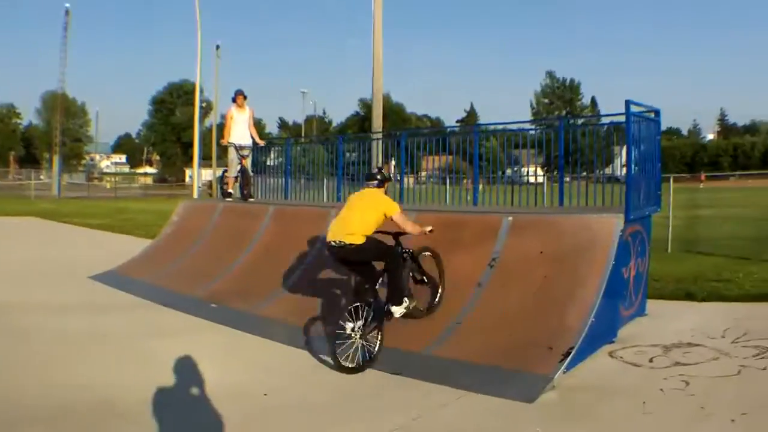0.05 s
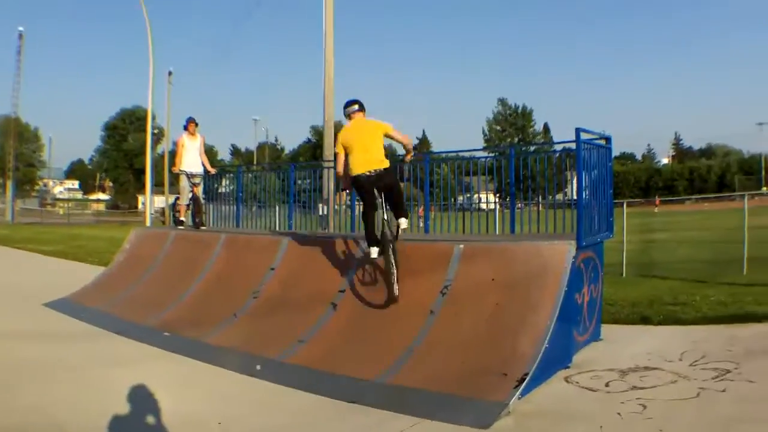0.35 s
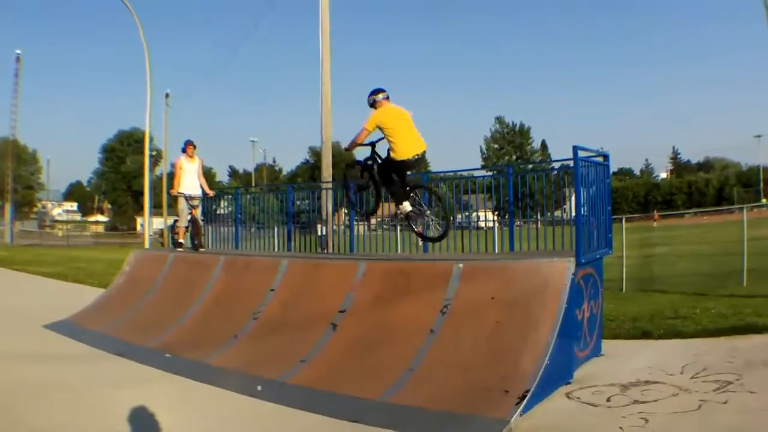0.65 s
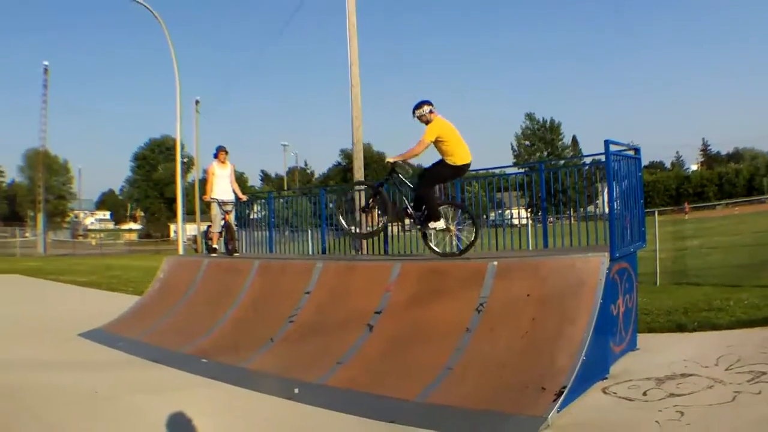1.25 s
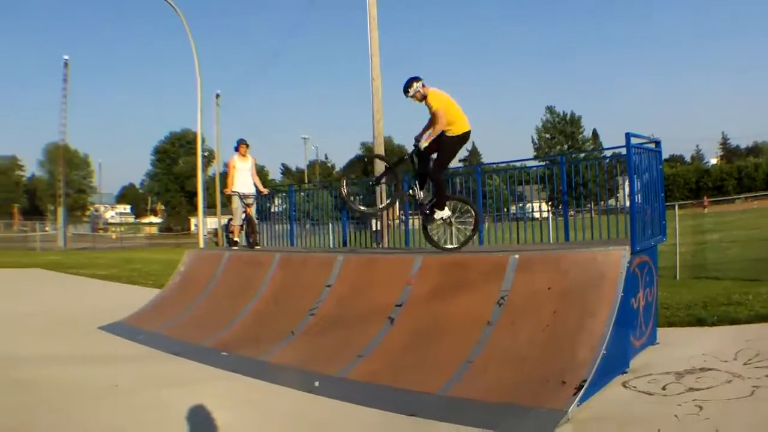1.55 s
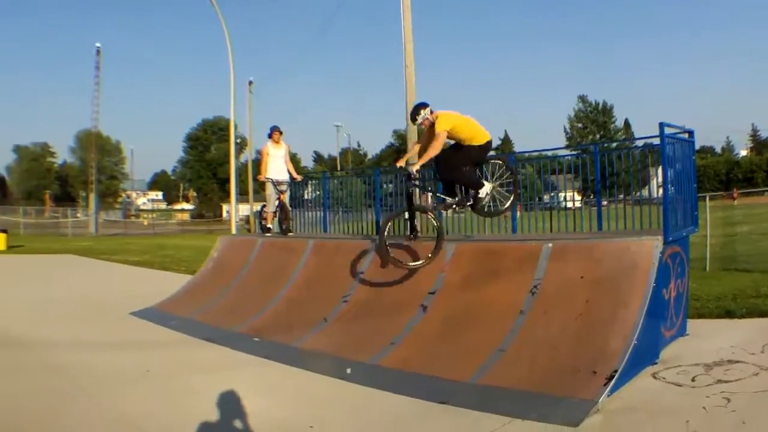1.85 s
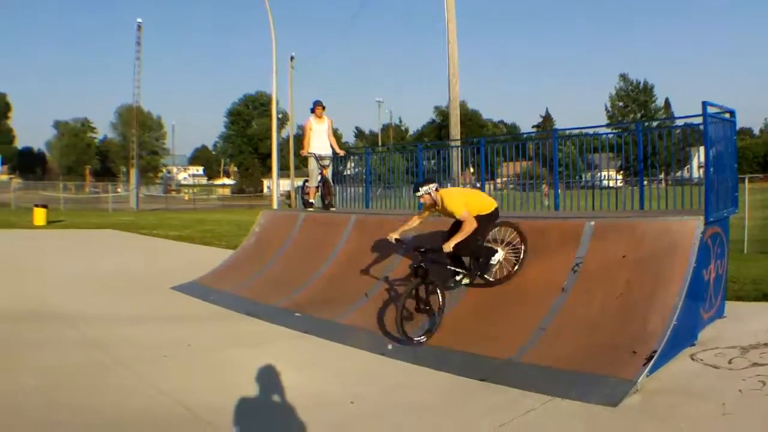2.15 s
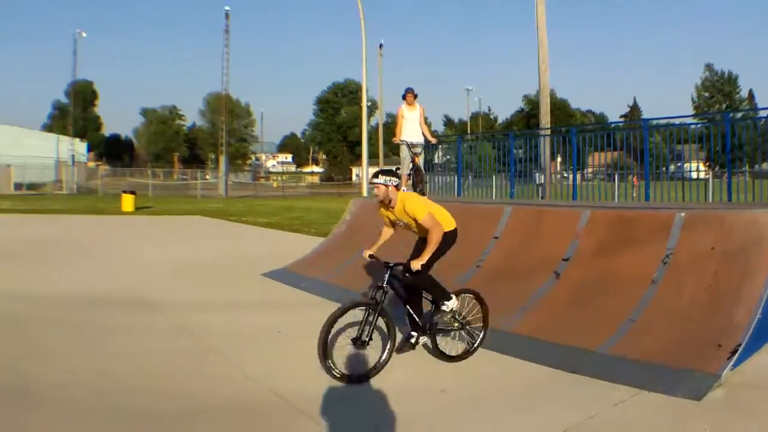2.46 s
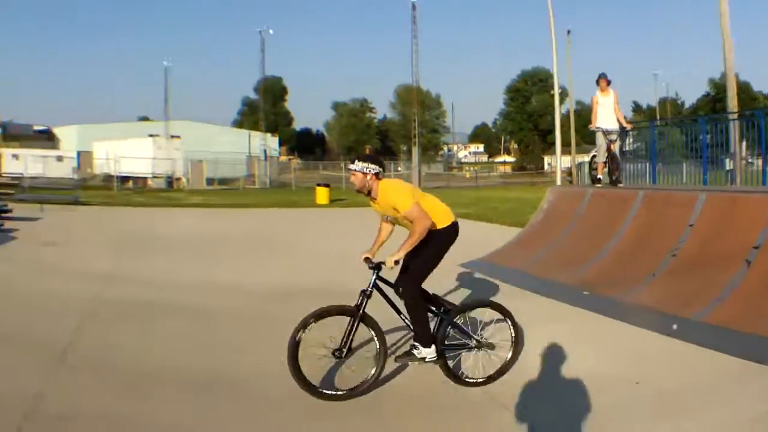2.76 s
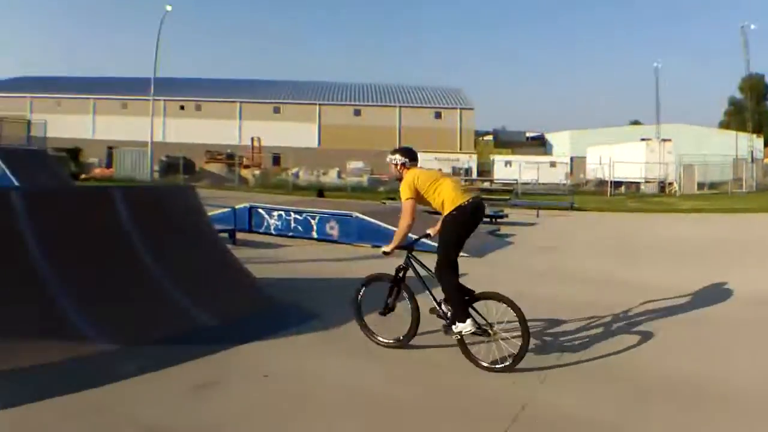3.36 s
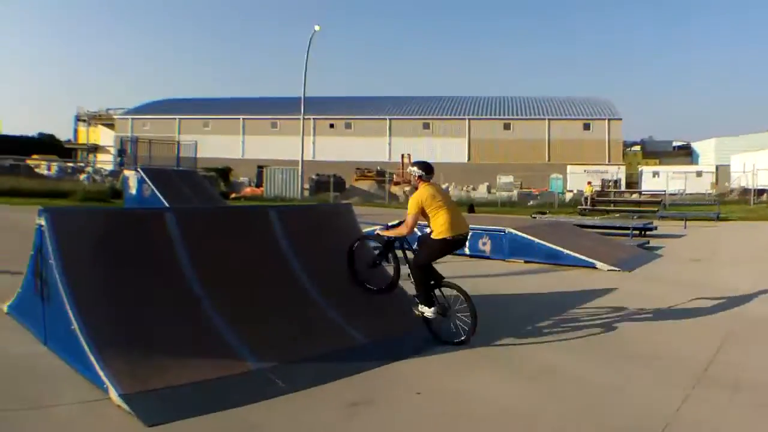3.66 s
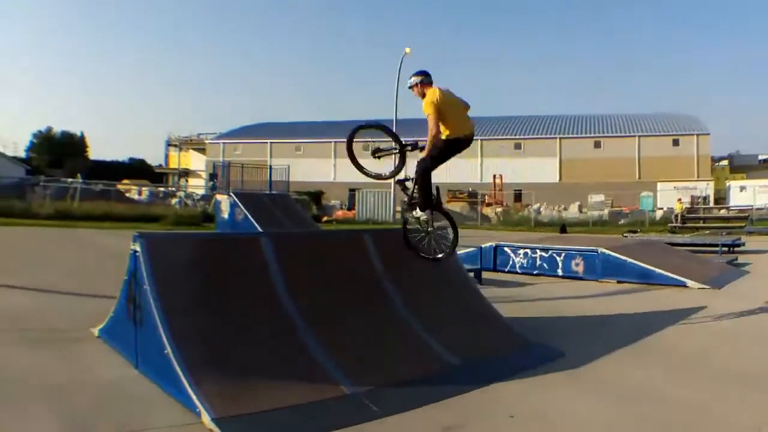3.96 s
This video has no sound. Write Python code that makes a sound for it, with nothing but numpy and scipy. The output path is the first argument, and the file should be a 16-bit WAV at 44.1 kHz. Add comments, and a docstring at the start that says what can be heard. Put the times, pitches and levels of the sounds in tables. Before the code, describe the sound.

A bicycle thumps and rumbles up a hollow ramp, its freewheel ticking. A dull pop comes at 0.6 seconds, then lighter knocks around 0.9 and a faint tyre scuff near 1.6. From 2 to 2.5 seconds it booms and rattles back down. A sharp, close clack follows at 2.75, tyres roll over concrete, and from 3.6 the wheels clank and rumble onto a second ramp. Distant traffic lies underneath.

```python
"""Bicycle on skatepark ramps.

A bike rides up a hollow ramp, stalls on the deck, drops back in, rolls over concrete and hits a
second ramp at its steel foot plate. Wheel blows and rolling set the panels booming while the bike
rattles and its freewheel ticks. One sharp clack close by echoes off the bars of a railing.
Distant traffic lies underneath."""
import sys
import numpy as np
from scipy import signal
from scipy.fft import rfft, irfft
from scipy.io import wavfile

SR = 44100
rng = np.random.default_rng(int(sys.argv[2]) if len(sys.argv) > 2 else 0)


def put_to_file(sound):
    """Save the sound as 16-bit audio at rate SR, in the file named by the first command-line argument."""
    columns = np.atleast_2d(sound).T  # one column per channel
    safe = np.clip(columns, -1, 1)
    whole_steps = np.round(safe * 32767)
    wavfile.write(sys.argv[1], SR, whole_steps.astype(np.int16))


N = 176400


def undb(db):
    """Decibels to gain."""
    return 10 ** (np.asarray(db) / 20)


def curve(rows):
    """Gain over time from (time_s, level_db) points."""
    time_s, level_db = np.array(rows).T
    return undb(np.interp(np.arange(N) / SR, time_s, level_db))


def fade(t, t60_s):
    """Exponential decay from t = 0."""
    return (t >= 0) * np.exp(-np.log(1000) * np.maximum(t, 0) / t60_s)


def noise():
    """White noise."""
    return rng.standard_normal(N)


def wander(rate_hz):
    """Smooth random drift of unit spread."""
    drift = np.interp(np.arange(N) * rate_hz / SR, np.arange(N), noise())
    return drift / drift.std()


def convolve(x, response):
    """Play x through an impulse response."""
    return signal.fftconvolve(x, response)[:N]


def colour(x, spectrum, size=4096):
    """Minimum-phase filter from (freq_hz, gain_db) points, scaled to keep the power of white noise."""
    freq_hz, gain_db = np.array(spectrum).T
    bins_hz = np.arange(size // 2 + 1) * SR / size
    gain = undb(np.interp(np.log(bins_hz + 1), np.log(freq_hz), gain_db))
    cepstrum = irfft(np.log(gain))
    cepstrum[1:size // 2] *= 2
    cepstrum[size // 2 + 1:] = 0
    response = irfft(np.exp(rfft(cepstrum)))
    return convolve(x, response / np.linalg.norm(response))


def ring_modes(age_s, modes):
    """Decaying sines from (pitch_hz, gain_db, t60_s) rows."""
    return sum(undb(db) * fade(age_s, t60_s) * np.sin(2 * np.pi * hz * age_s) for hz, db, t60_s in modes)


def resonate(drive, spectrum, t60_s, tail_t60_s, tail_db, spots=8):
    """A body with dense modes, struck at shifting spots: a quick decay, then a longer tail."""
    spots_per_s, spots_at_once = 5, 4
    age_s = np.arange(SR) / SR
    decay = fade(age_s, t60_s) + undb(tail_db) * fade(age_s, tail_t60_s)
    spot = (spots_per_s * np.arange(N) / SR + spots_at_once * rng.random(N)).astype(int) % spots
    ringing = sum(convolve(drive * (spot == k), rng.standard_normal(SR) * decay) for k in range(spots))
    return colour(ringing / np.linalg.norm(decay), spectrum)


# Wheel blows: start_s, level_db, contact_s, frame_offset_db, rattle_offset_db
WHEEL_BLOWS = [(-.004, -23, 0.0035, 3, -0.5), (0.038, -32.5, 0.014, 14, 6.5),
               (0.117, -23, 0.0032, 3.5, 10.5), (0.126, -14.5, 0.021, 1.5, 1.5),
               (0.166, -25, 0.011, 10.5, 0.5), (.831, -38.5, 0.0014, 8, 1), (0.865, -34.5, 0.014, 10, -0.5),
               (0.905, -35, 0.0098, 7, 6.5), (0.928, -35.5, 0.015, 4.5, 3.5),
               (0.95, -34.5, 0.0058, 4.5, -4), (1.017, -42, 0.0039, 13.5, -15),
               (1.580, -46.5, 0.0027, -11, -2), (2.041, -38, 0.0062, 1, -11),
               (2.051, -33.5, 0.0087, -12, 3), (2.067, -26, 0.0033, 10, 1.5),
               (2.091, -25.5, 0.0062, 1, 3.5), (2.109, -27, .005, 0, 2), (2.301, -35, 0.0073, 4, 8),
               (2.398, -26.5, 0.014, 6, -2), (2.48, -36, 0.0071, 3, 8.5), (3.565, -28, 0.0053, 12.5, 13),
               (3.572, -22, 0.013, 12, 8.5), (3.594, -25, 0.004, 6, -13), (3.707, -23.5, 0.024, 12.5, 5.5),
               (3.719, -21.5, 0.0056, 1.5, -1), (3.744, -24.5, 0.0083, 9.5, 0), (3.806, -26, 0.015, -6, 2),
               (3.836, -23.5, 0.023, 9.5, 9)]
# Tyres on the ramps: time_s, level_db
ROLL_LEVELS = [(0, -30.5), (.11, -37), (.27, -34.5), (.34, -80), (.5, -63), (.85, -56.5), (.97, -46),
               (1.12, -50), (1.25, -69), (2.03, -71), (2.12, -28.5), (2.24, -39.5), (2.32, -31.5),
               (2.39, -45), (2.51, -34.5), (2.68, -61.5), (3.54, -52), (3.6, -29), (3.69, -34),
               (3.78, -29.5), (3.9, -30.5), (4, -84)]
# Hollow ramp frame, face panels, loose bike parts: freq_hz, gain_db
FRAME_SPECTRUM = [(25, -30), (55, -21.5), (110, -17.5), (145, -11.5), (180, -9.5), (225, -3), (320, -2.5),
                  (420, 0.5), (490, 0.5), (570, -10), (800, -15.5), (2000, -80)]
PANEL_SPECTRUM = [(200, -51), (580, -14.5), (690, 2.5), (820, 4.5), (1100, 0.5), (1330, 1), (1470, -3),
                  (1600, -11.5), (1730, 2), (1880, -0.5), (2000, -11.5), (2200, -25.5), (3000, -34.5),
                  (9000, -69)]
RATTLE_SPECTRUM = [(700, -38), (2000, 10.5), (2500, 6), (2820, 0.5), (3250, 5), (4300, -0.5), (5400, -9),
                   (6400, -11), (8000, -21.5), (15000, -45)]
TYRE_SQUASH_S = 0.002

def ramps(t):
    """Wheel blows and uneven rolling drive the ramp's frame, its panels and the bike's loose parts."""
    frame_db, rattle_db, blow_window_s = -15.7, -20.3, 0.013
    rolling = curve(ROLL_LEVELS) * undb(wander(70) - 0.5)
    power = (rolling * undb([3, 0, -2])[:, None]) ** 2  # rows: frame, panels, rattle
    for start_s, level_db, contact_s, frame_offset_db, rattle_offset_db in WHEEL_BLOWS:
        age_s = np.maximum(t - start_s, 0)
        push = ((1 - np.exp(-age_s / TYRE_SQUASH_S)) * np.exp(-age_s / contact_s)) ** 2
        gains = undb([level_db + frame_offset_db, level_db, level_db + rattle_offset_db])
        power += gains[:, None] ** 2 * push * blow_window_s * SR / push.sum()
    frame_drive, panel_drive, rattle_drive = np.sqrt(power) * np.sign(rng.standard_normal((3, N)))
    frame = resonate(frame_drive, FRAME_SPECTRUM, t60_s=0.056, tail_t60_s=0.74, tail_db=-4)
    panels = resonate(panel_drive, PANEL_SPECTRUM, t60_s=0.042, tail_t60_s=0.58, tail_db=-13)
    rattle = resonate(rattle_drive, RATTLE_SPECTRUM, t60_s=0.024, tail_t60_s=0.35, tail_db=-14.5)
    return undb(frame_db) * frame + panels + undb(rattle_db) * rattle


# Wheel slaps: start_s, level_db
PLATE_SLAPS = [(3.5715, -26), (3.7215, -25.5)]
# Steel plate modes: pitch_hz, gain_db, t60_s
STEEL_MODES = [(470, -9, .14), (778, -3, .1), (830, -1, .11), (2550, -18, .12), (3040, -14, .16),
               (3310, -12, .11), (3450, -11, .09), (4870, -17, .09)]

def foot_plate(t):
    """Each wheel slaps the steel plate at the foot of the second ramp: a short boom under a clank."""
    slaps = 0
    for start_s, level_db in PLATE_SLAPS:
        age_s = np.maximum(t - start_s, 0)
        attack = 1 - np.exp(-age_s / TYRE_SQUASH_S)
        slaps += undb(level_db) * attack * ring_modes(age_s, STEEL_MODES)
    return slaps


# Rider's weight landing: start_s, level_db, t60_s
DECK_THUDS = [(.831, -55.5, 0.73), (2.06, -44.5, 0.35), (3.585, -63, 0.12), (3.736, -53, 0.13)]
# Rear tyre twisting: time_s, level_db
PIVOT_LEVELS = [(1.3, -86), (1.45, -70), (1.53, -70.5), (1.59, -66), (1.66, -62), (1.75, -93)]
# Deck thud, tyre scuff: freq_hz, gain_db
THUD_SPECTRUM = [(25, -2), (50, 0), (100, -2.5), (150, -3), (260, 2), (1000, -44), (4000, -87)]
SCUFF_SPECTRUM = [(400, -24), (1200, 9), (2000, -4), (2500, 0.5), (3300, -29), (6000, -31), (14000, -38)]

def deck(t):
    """The deck thuds under the rider, knocks as the rear wheel lands and groans as the tyre twists."""
    knock_s, knock_hz, knock_db = 0.8312, 725, -29
    groan_hz, scuff_db = 214, 5.5
    age_s = t - knock_s
    knock = undb(knock_db) * fade(age_s, t60_s=0.061) * np.sin(2 * np.pi * knock_hz * age_s)
    pitch_hz = groan_hz * (1 + 0.018 * wander(42))
    groan = np.sin(2 * np.pi * np.cumsum(pitch_hz) / SR) * undb(2 * wander(55))
    scuff = undb(scuff_db) * colour(noise() * undb(2 * wander(120)), SCUFF_SPECTRUM)
    weight = sum(undb(level_db) * fade(t - start_s, t60_s) for start_s, level_db, t60_s in DECK_THUDS)
    thuds = colour(noise() * weight, THUD_SPECTRUM)
    return thuds + knock + curve(PIVOT_LEVELS) * (groan + scuff)


# Double knock: start_s, gain_db
CLACK_KNOCKS = [(2.7517, -15), (2.7538, -3.5)]
# Modes of the knocked part: pitch_hz, gain_db, t60_s
KNOCK_MODES = [(436, -20, .05), (705, -13, .06), (1025, -6, .065), (1217, -2, .05), (1370, -1, .025),
               (1760, -3, .035), (1912, 3.5, .024), (2342, -10, .03), (3553, -4, .025), (4090, -21, .04)]
# Impact noise: freq_hz, gain_db
CRACK_SPECTRUM = [(300, -14), (1000, 0), (2000, 0), (3000, -17), (3700, -9), (4600, -11), (5300, -23),
                  (7500, -23), (9000, -36), (15000, -50)]

def clack(t):
    """A hard double knock on the passing bike: brief modes and a noisy crack."""
    modes_db, crack_db, tail_db = -23, -31, -5
    rise_s, highpass_hz = 0.00025, 277
    knocks = 0
    for start_s, gain_db in CLACK_KNOCKS:
        age_s = t - start_s
        attack = 1 - np.exp(-(np.maximum(age_s, 0) / rise_s) ** 2)
        modes = attack * ring_modes(age_s, KNOCK_MODES)
        decay = fade(age_s, t60_s=0.014) + undb(tail_db) * fade(age_s, t60_s=0.085)
        crack = colour(noise() * decay, CRACK_SPECTRUM)
        knocks += undb(gain_db) * (undb(modes_db) * modes + undb(crack_db) * crack)
    return signal.sosfilt(signal.butter(4, highpass_hz, "high", fs=SR, output="sos"), knocks)


def railing_echo(source):
    """Bar after bar of a railing returns the sound as a dull falling zing."""
    distance_m, bar_gap_m, scatter_m, sound_m_per_s = 4.0, 0.08, 0.012, 343
    lowpass_hz, echo_db = 2720, -24.5
    paths_m = np.hypot(distance_m, bar_gap_m * np.arange(30, 400))
    paths_m += scatter_m * rng.standard_normal(len(paths_m))
    lags = (2 * np.abs(paths_m - distance_m) / sound_m_per_s * SR).astype(int)
    gains = distance_m / paths_m * (1 + 0.5 * rng.standard_normal(len(paths_m)))
    echoes = convolve(source, np.bincount(lags, gains))
    return undb(echo_db) * signal.sosfilt(signal.butter(6, lowpass_hz, fs=SR, output="sos"), echoes)


# Freewheel ticking: time_s, level_db
FREEWHEEL_LEVELS = [(0, -59.5), (.45, -65.5), (.6, -66), (.79, -63.5), (.95, -72), (1.35, -85), (1.6, -69),
                    (1.75, -80.5), (2.9, -71.5), (3.15, -71), (3.35, -63.5), (3.55, -64.5), (4, -61)]
# Ringing hub: freq_hz, gain_db
HUB_SPECTRUM = [(1200, -20), (2450, 17), (2750, 0.5), (3050, 11), (3450, 9.5), (4200, 1.5), (5400, -4.5),
                (8300, -0.5), (9050, -3), (9350, 0.5), (9800, -7.5), (15000, -18)]

def freewheel():
    """Two pawls, one louder, tick in turn into the ringing hub."""
    clicks_per_s, weak_pawl_db = 140, -2
    tooth = np.floor(np.cumsum(clicks_per_s * (1 + 0.12 * wander(20))) / SR)
    clicks = np.diff(tooth, prepend=0) * undb(2 * wander(200) + weak_pawl_db * (tooth % 2))
    hub = resonate(clicks / clicks.std(), HUB_SPECTRUM, t60_s=0.018, tail_t60_s=0.15, tail_db=-13, spots=2)
    return hub * curve(FREEWHEEL_LEVELS)


# Chain ticks: start_s, level_db
CHAIN_TICKS = [(2.0803, -38), (2.087, -39), (2.0937, -36), (2.1093, -40), (3.144, -53), (3.241, -56),
               (3.284, -43), (3.289, -47)]
# Chain metal: freq_hz, gain_db
CHAIN_SPECTRUM = [(100, -32), (800, -6), (1900, 17), (2800, 4), (7000, 0), (15000, -16)]

def chain(t):
    """The chain ticks now and then: a metal snap with a short ring."""
    snap_t60_s, ring_t60_s, ring_db = 0.004, 0.04, -12
    envelope = 0
    for start_s, level_db in CHAIN_TICKS:
        age_s = t - start_s
        envelope += undb(level_db) * (fade(age_s, snap_t60_s) + undb(ring_db) * fade(age_s, ring_t60_s))
    return colour(noise() * envelope, CHAIN_SPECTRUM)


def pop(t):
    """One dull pop of about two cycles, with no ring."""
    centre_s, width_s, pitch_hz, level_db = 0.5625, 0.0016, 520, -27
    offset_s = t - centre_s
    return undb(level_db) * np.exp(-(offset_s / width_s) ** 2) * np.sin(2 * np.pi * pitch_hz * offset_s)


# Tyres on concrete: time_s, level_db
TREAD_LEVELS = [(0, -73), (.5, -71), (2.3, -68.5), (2.6, -57), (2.85, -48), (3.05, -56), (3.2, -48.5),
                (3.35, -64), (3.55, -52), (4, -52)]
# Tread noise: freq_hz, gain_db
TREAD_SPECTRUM = [(60, -42), (250, -16), (400, -5), (600, -14), (750, -3), (1000, 7.5), (1400, -8.5),
                  (1900, -6), (2300, -24), (5000, -31.5), (14000, -49)]

def tyres():
    """Tread runs over gritty concrete."""
    grit = noise() * undb(2 * wander(90))
    return colour(grit, TREAD_SPECTRUM) * curve(TREAD_LEVELS)


# Distant traffic, faint hiss: freq_hz, gain_db
TRAFFIC_SPECTRUM = [(25, -34), (80, -12), (130, -14.5), (210, -13.5), (330, -15.5), (550, -7), (900, 3.5),
                    (1250, -3), (1600, -6.5), (2000, -19.5), (3000, -28), (5000, -35.5), (15000, -42)]
HISS_SPECTRUM = [(150, -10), (600, -11.5), (2000, -5), (7000, -3), (9000, -5), (15000, -11.5)]

def background():
    """Far traffic, a thin high whine and a faint hiss that differs between the ears."""
    traffic_db, swell_db, hiss_db = -52.5, 0.3, -73
    whine_hz, whine_db = 7930, -84.5
    traffic = colour(noise(), TRAFFIC_SPECTRUM) * undb(traffic_db + swell_db * wander(5.7))
    whine = undb(whine_db) * wander(120) * np.sin(2 * np.pi * whine_hz * np.arange(N) / SR)
    hiss = undb(hiss_db) * np.array([colour(noise(), HISS_SPECTRUM) for _ in range(2)])
    return traffic + whine + hiss


def scene():
    """Stereo mix, all centred but the hiss."""
    t = np.arange(N) / SR
    ride = ramps(t) + foot_plate(t) + deck(t)
    knock = clack(t)
    return ride + knock + railing_echo(knock) + freewheel() + chain(t) + pop(t) + tyres() + background()


def record(dry):
    """Steep low-pass on the top treble."""
    cutoff_hz = 15300
    return signal.sosfilt(signal.ellip(10, 0.2, 70, cutoff_hz, fs=SR, output="sos"), dry)


dry = scene()
out = record(dry)
put_to_file(out)
```